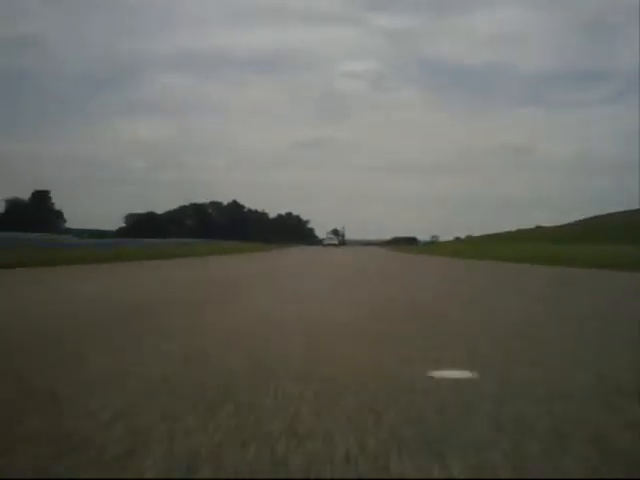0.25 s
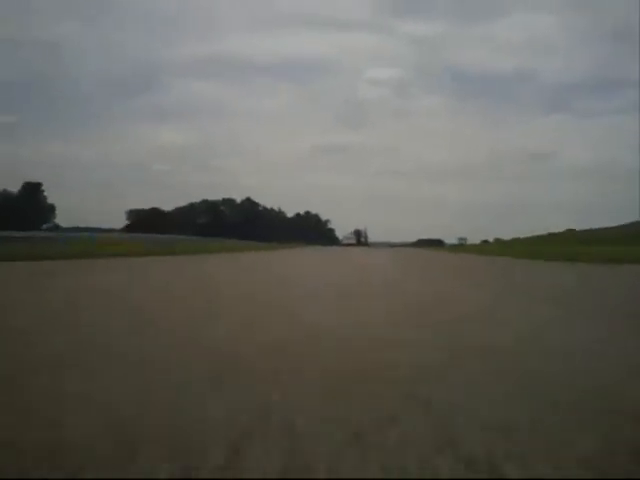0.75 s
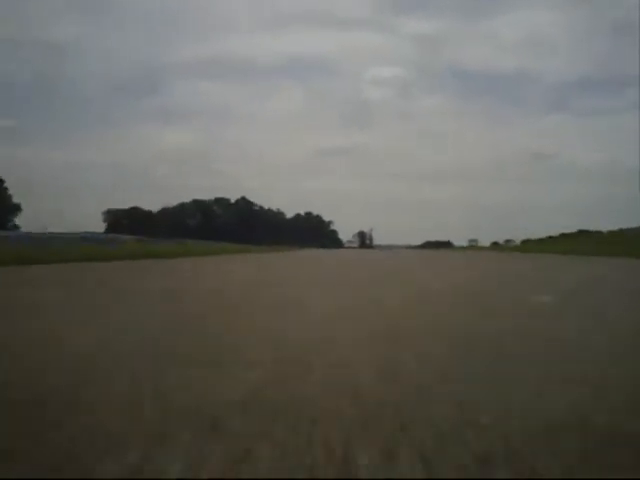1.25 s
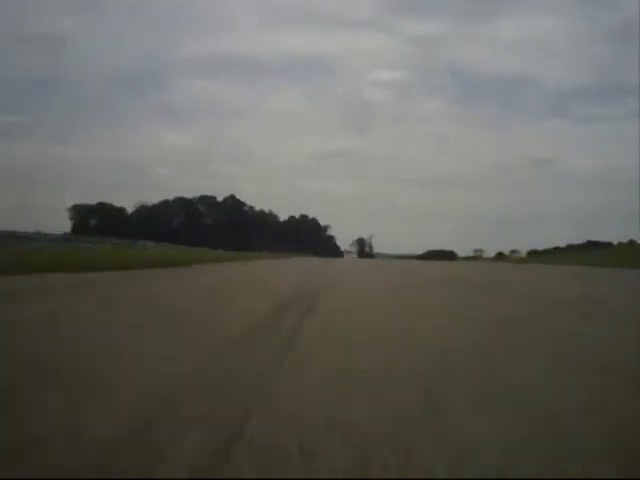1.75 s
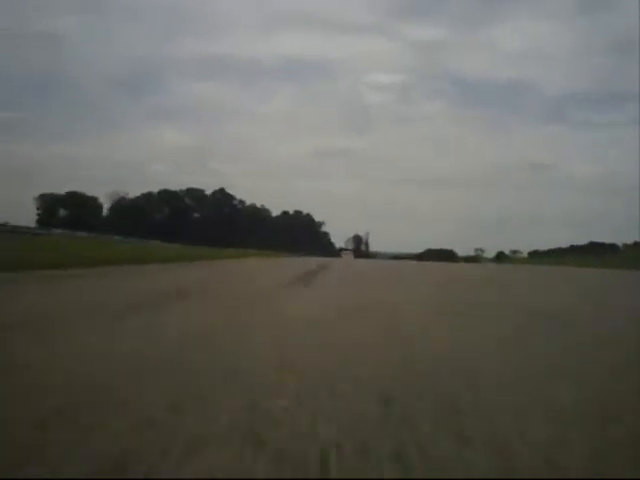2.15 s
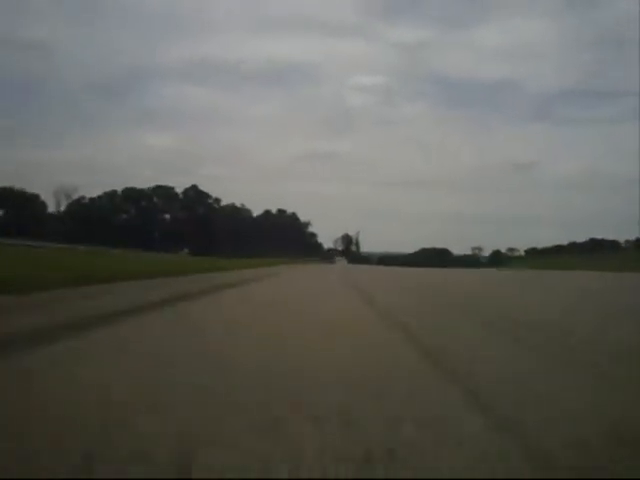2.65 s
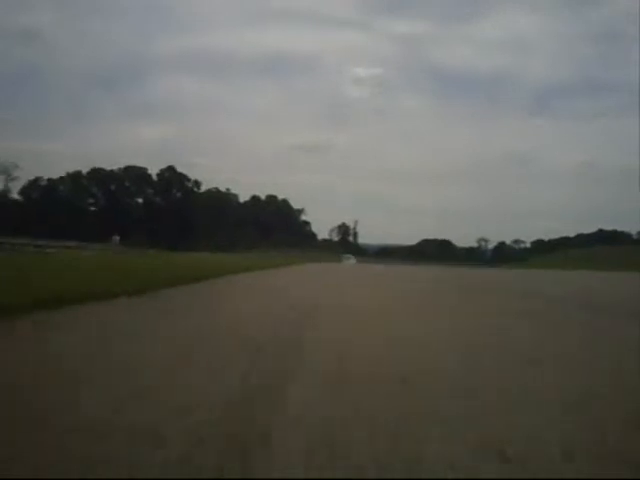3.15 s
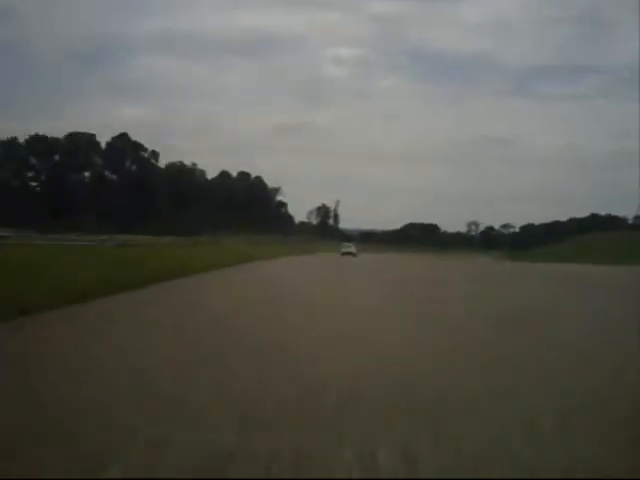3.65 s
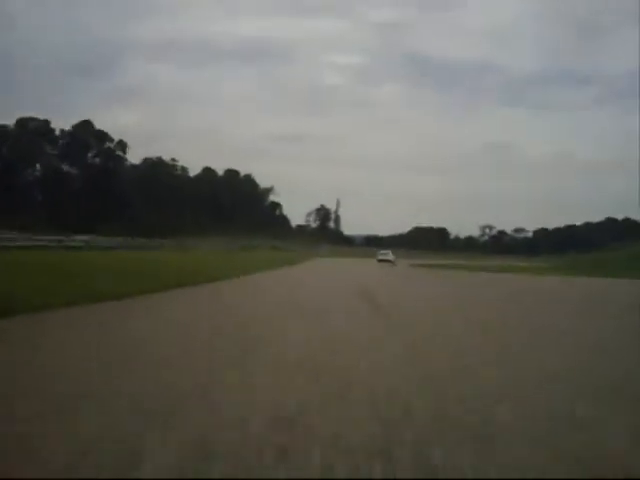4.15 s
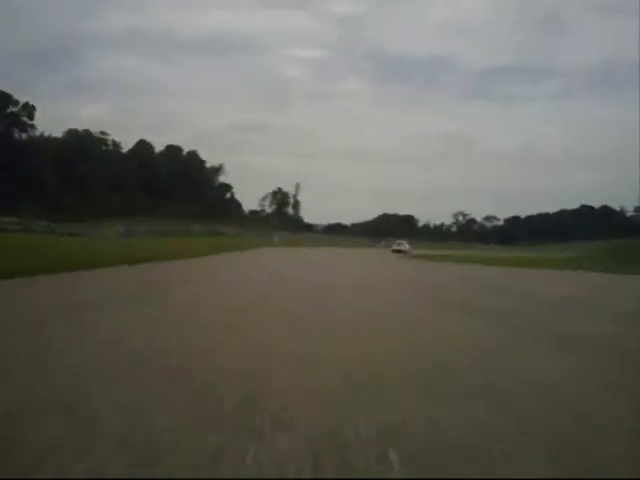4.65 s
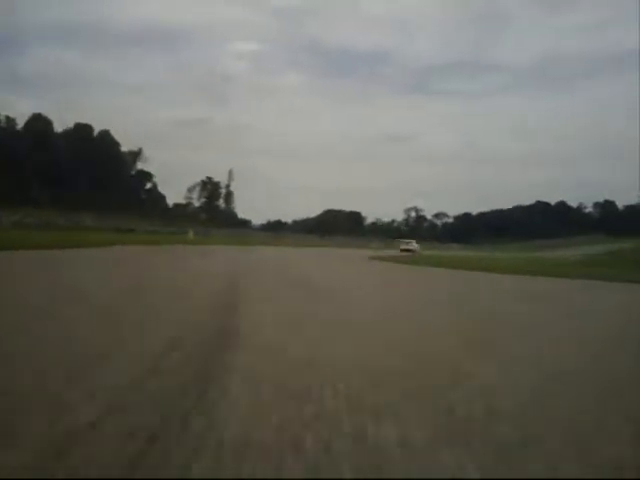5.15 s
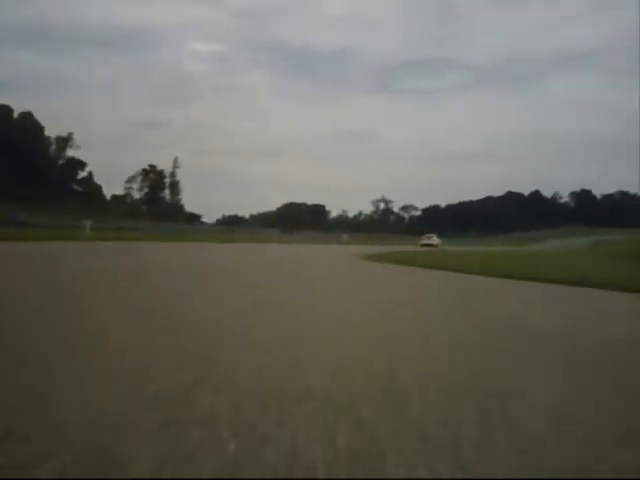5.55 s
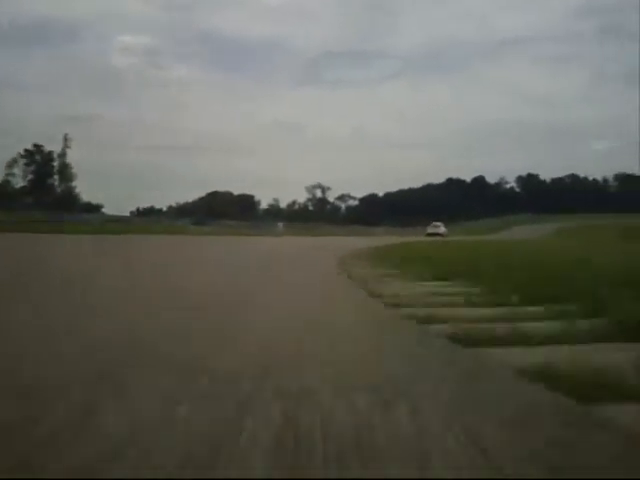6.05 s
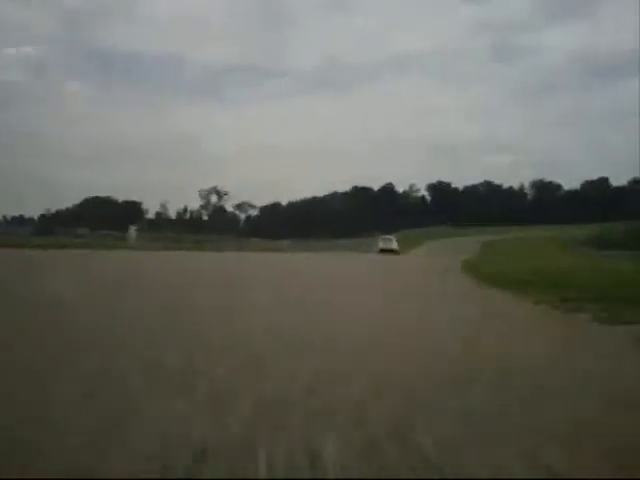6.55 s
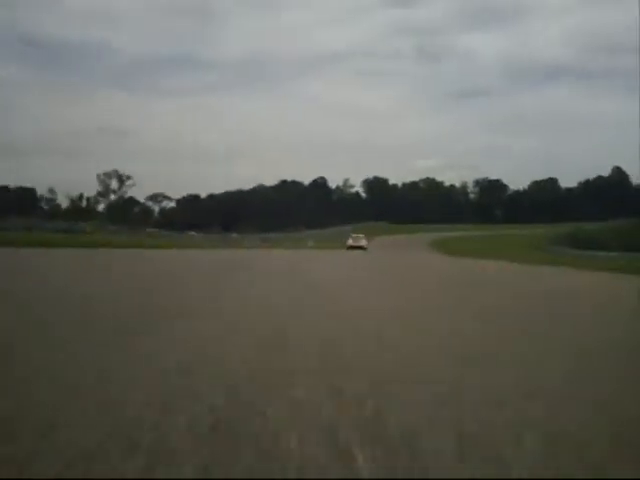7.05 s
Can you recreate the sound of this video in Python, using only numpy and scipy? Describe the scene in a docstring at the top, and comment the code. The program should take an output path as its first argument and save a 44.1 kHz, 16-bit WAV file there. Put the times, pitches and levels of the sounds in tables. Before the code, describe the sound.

Racing engine drone rises slowly, eases and sinks through a bend, with rushing wind, low rumble and one harsh, crackling overloaded burst over a ribbed kerb.

```python
"""A six-cylinder engine at high revs on a circuit, heard from a camera low on the car's nose.
Engine orders and gear mesh are sums of tones locked to the firing cycle; the driver lifts off for a bend.
The wheels cross a ribbed kerb: a saturating oscillation of the mount overloads the converter, which crackles.
Behind lie filtered noise for wind in the camera housing and road rumble, and two ticks of grit."""
import sys
import numpy as np
from scipy import signal
from scipy.fft import rfft, irfft
from scipy.io import wavfile
from scipy.ndimage import uniform_filter1d

SR = 44100
rng = np.random.default_rng(int(sys.argv[2]) if len(sys.argv) > 2 else 0)


def generate_wav(sig):
    """Save sig (samples, or channels by samples) to the path in sys.argv[1] as 16-bit PCM at SR."""
    pcm = np.round(np.clip(np.atleast_2d(sig).T, -1, 1) * 32767).astype(np.int16)
    wavfile.write(sys.argv[1], SR, pcm)


N = 321912
T = np.arange(N) / SR  # time in s

# engine speed, climbing under power and sinking into the bend: t/s, four-stroke cycle rate f/Hz
CYCLE_RATE = [(0.0, 46.68), (0.6, 47.44), (1.3, 48.8), (2.0, 50.1), (3.9, 53.04), (4.5, 52.8), (5.8, 51.66),
              (6.6, 50.37), (7.3, 47.97)]


def undb(db):
    """Level to amplitude: 20 dB is a factor of ten."""
    return 10 ** (np.asarray(db) / 20)


def curve(rows):
    """Linear interpolation in time through rows of (t/s, value)."""
    return np.interp(T, *np.transpose(rows))


def unit(x):
    """Normalisation to an rms amplitude of 1."""
    return x / np.sqrt(np.mean(x ** 2))


def walk(rate):
    """Low-pass random fluctuation: levels held for 1 / rate s, then averaged twice; spread near 1."""
    hold = int(SR / rate)
    steps = np.repeat(rng.standard_normal(N // hold + 1), hold)
    smooth = uniform_filter1d(uniform_filter1d(steps, hold), hold)
    return 1.3 * smooth[:N]


def colour(x, points):
    """Spectral shaping by (f/Hz, level/dB) points joined over log frequency, scaled to rms 1."""
    hz, db = np.transpose(points)
    f = np.maximum(np.fft.rfftfreq(N, 1 / SR), 1)
    gain = undb(np.interp(np.log(f), np.log(hz), db))
    return unit(irfft(rfft(x) * gain, N))


def resonate(x, modes):
    """Parallel resonance: peaks of (f/Hz, half-amplitude width/Hz, level/dB) add, scaled to rms 1."""
    f = np.fft.rfftfreq(N, 1 / SR)
    gain = sum(undb(db) / (1 + (2 * (f - hz) / width) ** 2) for hz, width, db in modes)
    return unit(irfft(rfft(x) * gain, N))


def shut():
    """Throttle closure as a linear ramp: 0 wide open, 1 after the driver lifts off."""
    lift_s, close_s = 3.88, 0.1
    return np.clip((T - lift_s) / close_s, 0, 1)


def by_throttle(open_db, shut_db):
    """Load dependence: the level slides between two values in dB as the throttle closes."""
    return undb(open_db + (shut_db - open_db) * shut())


def by_speed(db_per_doubling):
    """Power law of speed: a fixed number of dB per doubling, with gain 1 at 50 cycles per second."""
    return undb(db_per_doubling * np.log2(curve(CYCLE_RATE) / 50))


def lines(cycle_hz, orders, waver_db, smear):
    """Order synthesis: tones at multiples of the four-stroke cycle rate, wavering in level and phase (smear in
    rad), slide through the fixed transfer function of the bodywork."""
    # transfer of a tone through the bodywork to the camera: f/Hz, level/dB
    body_transfer = [(900, -1), (1100, 0), (1230, -3.5), (1320, -2.5), (1430, -3), (1540, 4), (1680, 0),
                     (1790, -1), (1890, 2.5), (2000, -15.5), (2300, -5.5), (2550, -4)]
    turns = np.cumsum(cycle_hz) / SR
    out = 0
    for order, db in orders:
        phase = 2 * np.pi * (order * turns + rng.random()) + smear * walk(22)
        body_db = np.interp(order * cycle_hz, *np.transpose(body_transfer))
        rms = undb(db + body_db + waver_db * walk(9))
        out = out + np.sqrt(2) * rms * np.sin(phase)
    return out


def engine():
    """Periodic excitation: orders of the firing cycle, an exhaust resonance and cylinder-pulsed gas noise."""
    # engine lines under load: multiple of the cycle rate, rms level/dB before body and load gains
    pull_orders = [(4, -47), (6, -60), (7, -50), (16, -55), (18, -57.5), (19, -64), (21, -53), (22, -59),
                   (23, -53), (25, -67), (26, -76), (27, -44.5), (28, -62), (29, -51.5), (30, -54),
                   (31, -53.5), (32, -53), (33, -51.5), (34, -57), (36, -53), (38, -60), (39, -54),
                   (53, -51)]
    # firing overtones and gear mesh, with or without load: multiple of the cycle rate,
    # rms level/dB before body and load gains
    coast_orders = [(3, -38), (6, -52.5), (12, -52.5), (15.28, -60), (18, -59.5), (22.34, -62.5),
                    (24, -56.5), (33.5, -55.5), (37.5, -62), (48.85, -51), (55.2, -52.5), (55.9, -54.5)]
    cycle_hz = curve(CYCLE_RATE)
    turns = np.cumsum(cycle_hz) / SR
    pull = lines(cycle_hz, pull_orders, waver_db=1.03, smear=0.1)
    coast = lines(cycle_hz, coast_orders, waver_db=2.5, smear=0.14)

    # the exhaust drones as the fifth order passes through its resonance
    pipe_hz, pipe_width_hz = 243.6, 17.5
    pipe = 1 / np.hypot(1, 2 * (5 * cycle_hz - pipe_hz) / pipe_width_hz)
    drone = pipe * lines(cycle_hz, [(5, 0)], waver_db=1, smear=0.08)

    # escaping gas pulses three times and once per cycle
    pulses = 1 + 0.3 * np.cos(2 * np.pi * 3 * turns) + 0.14 * np.cos(2 * np.pi * turns)
    gas = rng.standard_normal(N) * pulses
    rasp = undb(-46) * resonate(gas, [(1450, 720, -2.5), (6430, 730, -8.5), (9560, 670, -10.5)])

    # gains with the throttle open and shut; the pull also grows with the revs
    loaded = (pull + rasp) * by_throttle(0.9, -12.5) * by_speed(db_per_doubling=9)
    free_running = coast * by_throttle(-2.5, 1.7)
    return loaded + free_running + drone * by_throttle(-34, -52.5)


def rocking(start, hold, release, hz, stagger):
    """Forced oscillation in a transient envelope: quick grip, hold, exponential release (times in s)."""
    grip_s = 0.0075
    age = T - start
    envelope = np.clip(age / grip_s, 0, 1) * np.exp(-np.maximum(age - hold, 0) / release)
    return envelope * np.sin(2 * np.pi * hz * age + stagger)


def kerb():
    """Saturating oscillator: ribs rock the mount against its stops, then it swings on at its own pitch."""
    # runs of ribs between which the wheels skip clear: start t/s, length t/s, shake rate f/Hz,
    # force level/dB before scatter and saturation
    rib_runs = [(5.9396, 0.18, 88.33, 0.5), (6.1226, 0.045, 95.1, 1.5), (6.1700, 0.0237, 75.6, 0.5),
                (6.2000, 0.021, 76.4, 2), (6.231, 0.029, 78.1, 3.5), (6.264, 0.076, 85.73, 0.5),
                (6.3438, 0.0339, 73.1, 0.5), (6.386, 0.036, 83, -7.5), (6.422, 0.024, 89.8, 1)]
    # no two ribs arrive quite evenly (phase in rad) or strike equally hard (dB)
    stagger = 0.17 * walk(170)
    strength = undb(1.3 * walk(120))
    release_s = 0.0012
    ribs = sum(undb(db) * rocking(start, length, release_s, hz, stagger)
               for start, length, hz, db in rib_runs)

    # off the last rib the mount starts the other way, holds, then dies away
    last_rib_s = max(start + length for start, length, _, _ in rib_runs)
    free = -undb(-7) * rocking(last_rib_s, hold=0.039, release=0.049, hz=98.7, stagger=stagger)

    # the mount rests nearer one stop, so its downward kicks are the harder ones
    stop, stiffness, preload = 1.01, 2.7, 0.13
    drive = stiffness * (ribs + free) * strength
    swing = stop * (np.tanh(drive + preload) - np.tanh(preload))
    # the squared-off pressure sags between swings
    droop_hz = 66
    return signal.lfilter(*signal.butter(1, droop_hz, "high", fs=SR), swing)


def rattle(shake):
    """Amplitude-driven noise: ring follows the shake's short-term rms, housing chatter its square."""
    # thin ring of the mount: f/Hz, width f/Hz, relative level/dB
    ring_modes = [(8030, 240, 3), (8140, 32, -3)]
    # f/Hz, relative level/dB
    chatter_spectrum = [(80, -4), (220, -5.5), (600, 3.0), (1000, -6), (2000, -15), (3100, -8.5),
                        (4000, -19), (5000, -16.5), (7000, -23), (12000, -23.0)]
    effort = np.sqrt(np.abs(uniform_filter1d(shake ** 2, size=600)))
    ring = undb(-37.0) * effort * resonate(rng.standard_normal(N), ring_modes)
    chatter = undb(-18.5) * effort ** 2 * colour(rng.standard_normal(N), chatter_spectrum)
    return ring + chatter


def wind():
    """Turbulent flow noise: broadband rush over the housing excites its resonances, louder with speed."""
    # airflow between the resonances: f/Hz, relative level/dB
    air_spectrum = [(200, -6.5), (550, 1.5), (760, -1), (1100, -0.5), (1900, -4), (2250, -10.5),
                    (3300, -5.5), (3950, -19.5), (4700, -7.5), (6500, -16.5), (7400, -16), (8700, -18.5),
                    (11000, -17), (12600, -19)]
    # resonances of the camera housing: f/Hz, width f/Hz, relative level/dB
    housing_modes = [(1525, 182, 3), (1918, 120, -2), (2700, 590, 0.5), (3463, 290, -11.5),
                     (4550, 194, -12), (5277, 500, -4.5), (6260, 160, -10), (6600, 250, -12),
                     (9430, 730, -18), (10760, 900, -11.5), (12240, 450, -35)]
    flutter = undb(0.5 * walk(18) + 0.71 * walk(250))
    rush = colour(rng.standard_normal(N), air_spectrum)
    cavities = resonate(rng.standard_normal(N), housing_modes)
    # a little stronger in the bend, once the throttle is shut
    bend_db = 0.68 * shut()
    gain = undb(-37.5 + bend_db) * by_speed(db_per_doubling=11)
    return (undb(-3.5) * rush + undb(-3.0) * cavities) * flutter * gain


def road():
    """Random excitation by rough asphalt: broadband body rumble and two slow modes of the camera mount."""
    # road rumble: f/Hz, relative level/dB per Hz
    rumble_spectrum = [(8, -11.5), (21, 0), (34, -14), (48, -4.5), (65, -3.5), (80, -3), (104, -0.5),
                       (117, -5), (132, -15), (180, -14.5), (240, -22.5), (345, -24), (440, -33.5),
                       (900, -58)]
    rumble = colour(rng.standard_normal(N), rumble_spectrum)
    boom = resonate(rng.standard_normal(N), [(99.9, 24, 1.5), (65.3, 4.8, -3.5)])
    bumps_db = 0.8 * walk(16)
    gain = undb(-21.5 + bumps_db) * by_speed(db_per_doubling=4.5)
    return (undb(-1.0) * rumble + undb(-3.5) * boom) * gain


def grit():
    """Impact noise: small stones tick on the bodywork with sudden onset and exponential decay."""
    # stone strikes: t/s, onset level/dB of the noise
    stones = [(0.399, -33), (1.87, -33)]
    decay_s = 0.0028
    strikes = sum(undb(db) * (T >= start) * np.exp(-np.abs(T - start) / decay_s) for start, db in stones)
    return strikes * resonate(rng.standard_normal(N), [(3000, 2600, 0)])


def scene():
    """Linear superposition of all sources at a single microphone."""
    jolts = kerb()
    # on the kerb the ribs take over from the asphalt
    on_kerb = np.clip(uniform_filter1d(np.abs(jolts), size=900) * 2, 0, 1)
    shake = jolts + road() * (1 - 0.6 * on_kerb)
    return (shake + rattle(shake) + wind() + engine() + grit())[None]


def record(dry):
    """Converter overflow: past full scale the output drops near zero, a crack each way; the top is cut."""
    # of the excess over full scale only 0.046 remains
    overflow = np.where(np.abs(dry) > 1, dry - 0.046 * (dry - np.sign(dry)), 0)
    # the edges of each dropout are slightly rounded
    edge_hz, top_hz = 11500, 12700
    overflow = signal.filtfilt(*signal.butter(1, edge_hz, fs=SR), overflow)
    low_pass = signal.ellip(10, 0.2, 80, top_hz, fs=SR, output="sos")
    return signal.sosfilt(low_pass, dry - overflow)


dry = scene()
out = record(dry)
generate_wav(out)
```